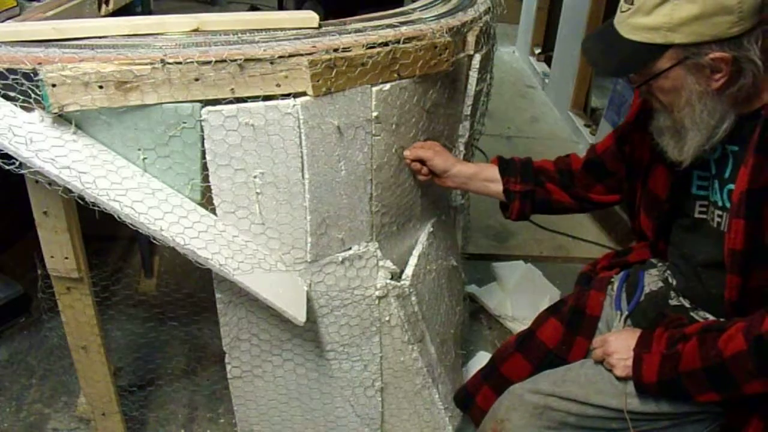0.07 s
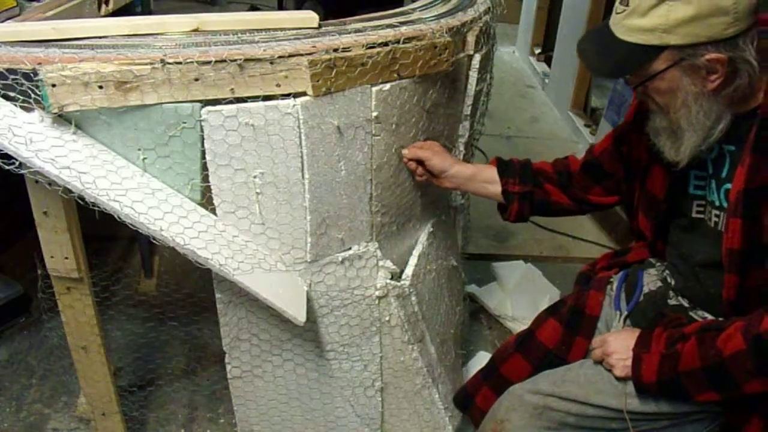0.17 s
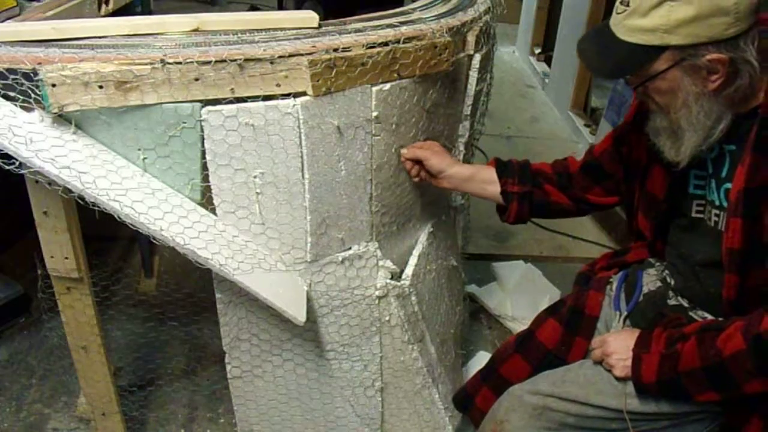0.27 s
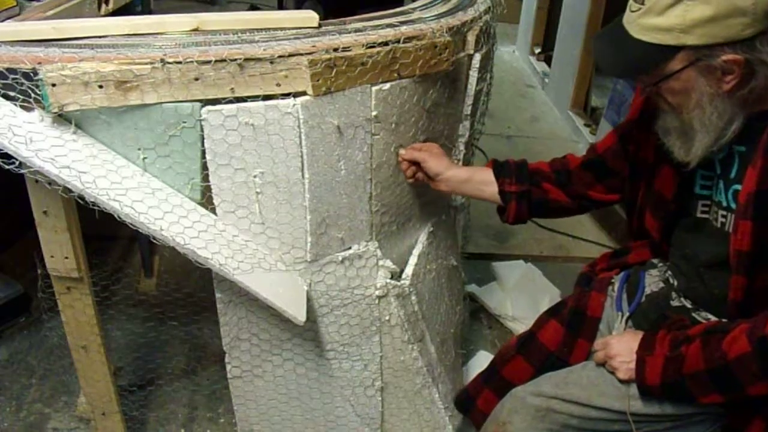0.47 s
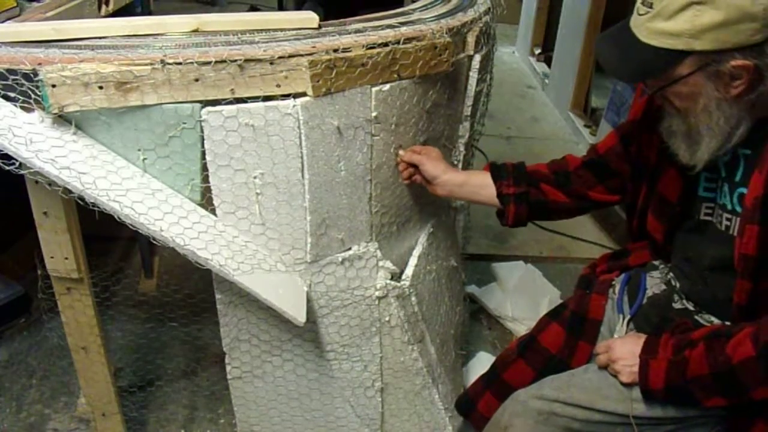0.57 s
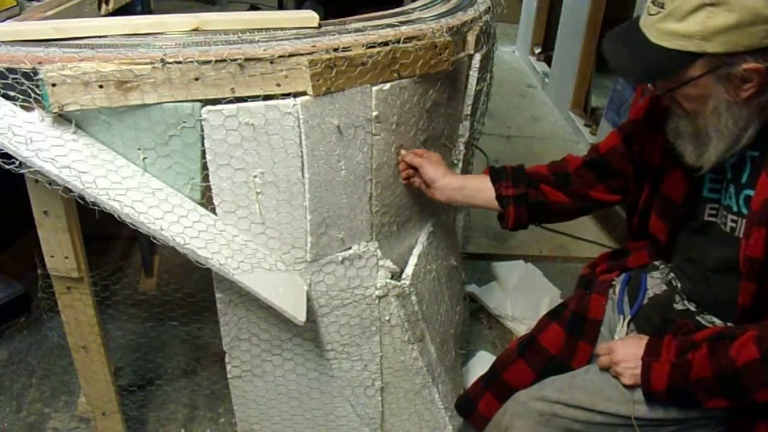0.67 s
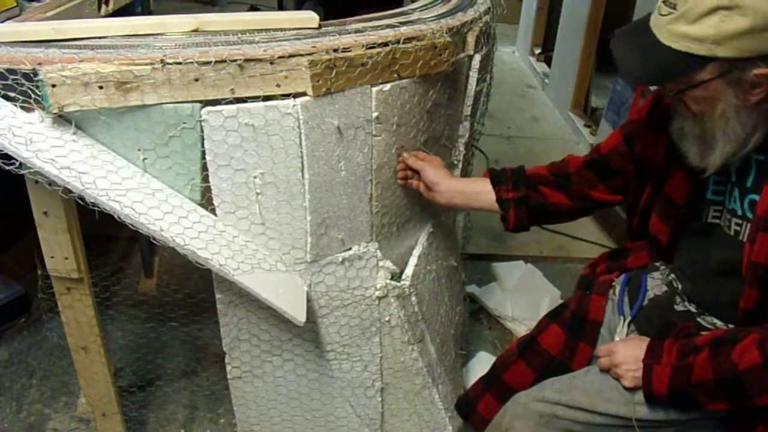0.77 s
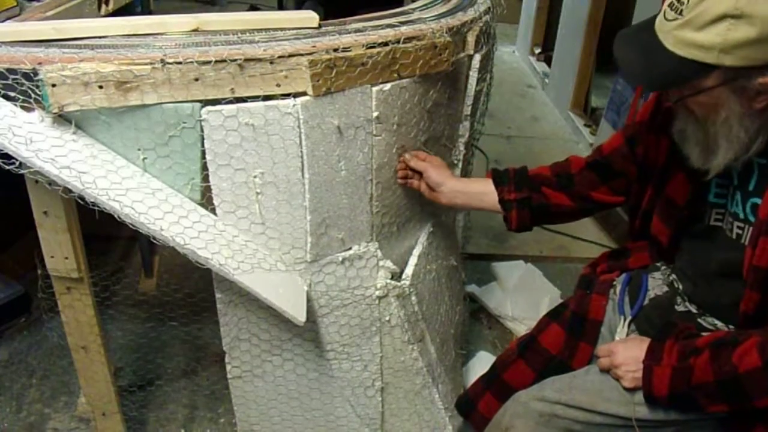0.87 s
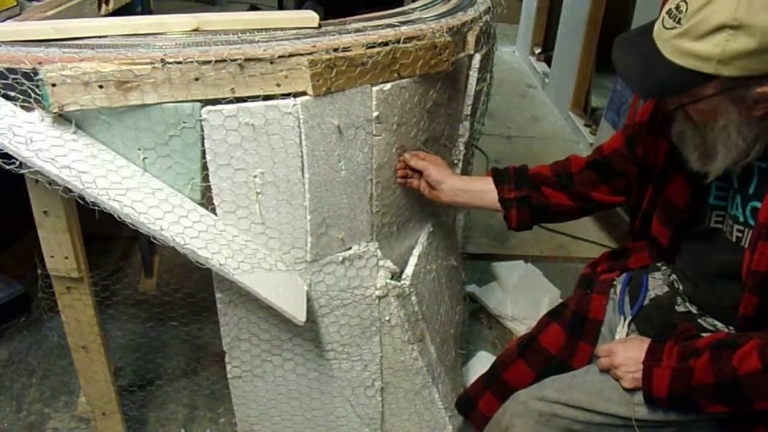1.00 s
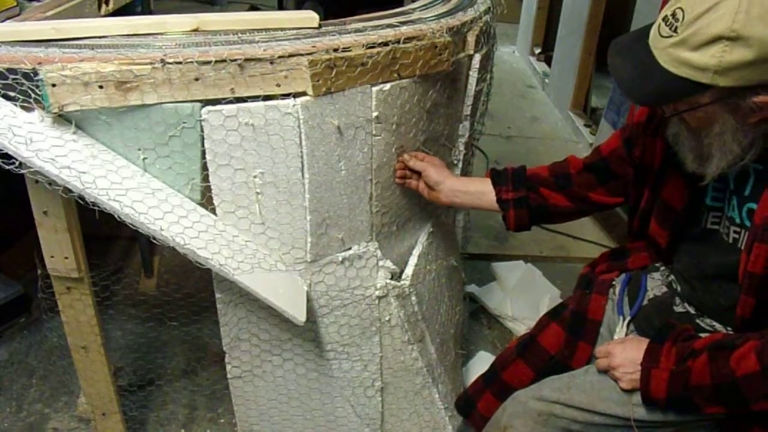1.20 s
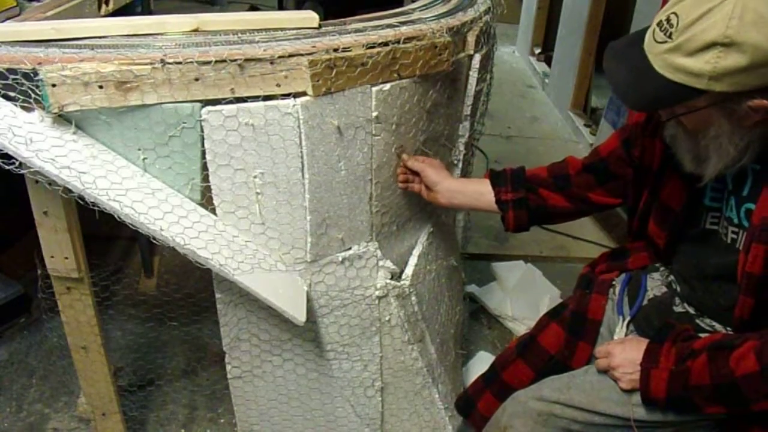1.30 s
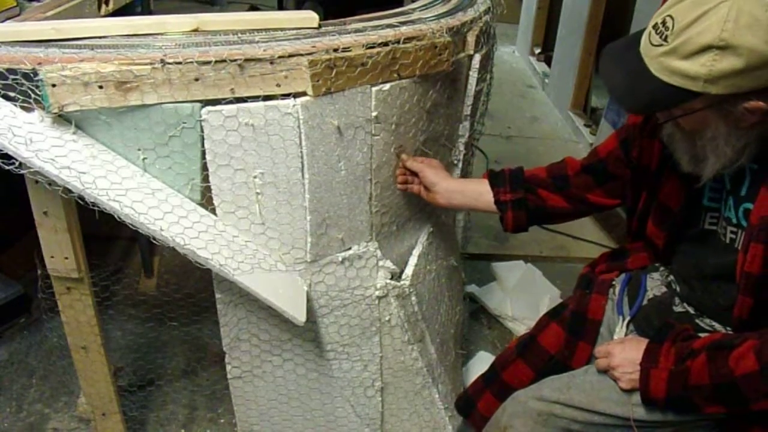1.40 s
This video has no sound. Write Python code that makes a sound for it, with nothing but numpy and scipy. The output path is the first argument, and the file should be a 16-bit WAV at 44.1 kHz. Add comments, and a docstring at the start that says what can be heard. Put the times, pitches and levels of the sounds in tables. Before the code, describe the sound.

Sharp clicks and a short rattle of wire mesh as a hand works a tie wire.

```python
"""Low room noise, the camera's thin whine and a faint scrape, on one microphone close to the work.
In a workshop, a hand works a tie wire on a foam panel covered in wire mesh. The wire snaps free, the
panel thumps and the mesh rattles. The wire scrapes on, catches once more, and the hand brushes back.
Each click runs along the wire as a bending wave, so its treble reaches the microphone first."""
import sys
import numpy as np
from scipy import signal
from scipy.fft import rfft, irfft, next_fast_len
from scipy.io import wavfile

SR = 44100
rng = np.random.default_rng(int(sys.argv[2]) if len(sys.argv) > 2 else 0)


def inscribe(sig):
    """Save sig as 16-bit PCM at rate SR to the path in sys.argv[1].

    A 1-D sig is mono; a 2-D sig holds one channel per row.
    Samples are clipped to [-1, 1] before scaling.
    """
    pcm = np.round(np.clip(np.atleast_2d(sig).T, -1, 1) * 32767)
    wavfile.write(sys.argv[1], SR, pcm.astype(np.int16))


N = 63945
T = np.arange(N) / SR
SIZE = next_fast_len(2 * N)
HZ = np.maximum(np.arange(SIZE // 2 + 1) * SR / SIZE, 1)

# Tone of the room, the hand's brushing, the wire on foam, the loose mesh and an arriving click.
# Each row: frequency in Hz, relative level in dB.
ROOM_TONE = [(25, -16), (55, -3.5), (140, 0.5), (280, -0.5), (450, -7), (750, -7), (1200, -12), (2200, -12),
             (4000, -28), (5600, -28.5), (6600, -24.5), (9000, -24.5), (11000, -29), (13000, -22),
             (16000, -25)]
BRUSH_TONE = [(150, -12), (400, 3), (900, 6), (2100, 3), (3000, -6.5), (6000, -20), (16000, -32)]
SCRAPE_TONE = [(150, -22), (480, -8), (720, -0.5), (1100, -0.5), (2300, -1), (3100, -3.5), (3900, -1),
               (4850, -8), (5500, -15), (6600, -12.5), (9300, -11.5), (10400, -18.5), (12500, -10.5),
               (16000, -15.5)]
CHATTER_TONE = [(500, -14), (2400, 1), (4500, 0), (5600, -22), (6600, -17), (9000, 3), (11000, -1),
                (13000, 8), (16000, 1)]
CLICK_TONE = [(150, -21.5), (600, -11.5), (1100, -5), (1600, 1.5), (2300, 0.5), (3200, -1.5), (4200, -1),
              (5700, -16.5), (6600, -2), (7800, -12.5), (8800, -2), (11000, -12), (12500, -4), (13600, -9),
              (14800, -16)]
# Course of the hand's brushing and of the wire's pressure on the foam.
# Each row: time in seconds, relative level in dB.
BRUSH_SWELL = [(1.25, -111), (1.28, -57.5), (1.32, -61), (1.36, -77), (1.40, -85), (1.42, -62.5),
               (1.45, -93)]
SCRAPE_PRESSURE = [(0, -61), (.07, -64), (.13, -67), (.2, -59), (.25, -49), (.61, -71.5), (.64, -63.5),
                   (.74, -63.5), (0.789, -58.5), (.82, -63), (.9, -56), (.95, -56), (1.055, -59),
                   (1.09, -66.5), (1.13, -60), (1.165, -60.5), (1.23, -75), (1.45, -72.5)]
# Resonances of the scraped panel and the caught strand. Each row: centre in Hz, width in Hz, gain in dB.
PANEL_PEAKS = [(699, 34, 9.5), (967, 44, 9), (2440, 160, 6), (4830, 170, 1)]
CAUGHT_PEAKS = [(590, 51, 12.5), (1570, 270, 5.5), (3620, 340, 6), (4770, 450, 11), (9250, 530, 2.5)]
# The wire's end scratches. Each row: peak time in seconds, length in seconds, level in dB, pitch in Hz.
END_SCRATCHES = [(.640, 0.033, -63, 2220), (0.795, 0.013, -62, 4340), (0.907, .015, -60, 2360),
                 (1.052, 0.031, -57, 3740), (1.154, 0.041, -64.5, 3720), (1.275, 0.018, -68, 4500)]
# What rings on: the panel's recoil, its higher modes, the shivering mesh, the frame and workshop.
# Each row: frequency in Hz, relative level in dB, seconds to fall by 60 dB.
RECOIL_MODES = [(146.8, -11.5, 0.69), (183, -0.5, 0.13), (229, 4, 0.17), (309.4, -8.5, 1), (489, 4, 0.095),
                (661.3, 2.5, 0.19), (776, -20, 0.45), (1000, 5, 0.075), (1530, -13, 0.046)]
PANEL_MODES = [(671.5, 0, 0.44), (730, 4.5, 0.47), (1048, 2, 0.39), (1635, -5, 0.51), (1728, -8, 0.51),
               (1853, -2, 0.4), (2100, -8, 0.49), (2332, -2, 0.26), (2485, 5, 0.5), (2570, 0, 0.63),
               (2955, 0, .45), (3120, -3, 0.42)]
MESH_SHIVER = [(150, -33, 0.08), (505, -11, 0.046), (1170, -3.5, 0.12), (2300, 4.5, 0.035),
               (3960, 0.5, 0.036), (5700, -7, 0.077), (9000, -4.5, .07), (10800, -14, 0.1),
               (13600, -11, .05), (15900, -31, 0.033)]
WORKSHOP_RING = [(99, -2.5, 1), (285, 3.5, 0.26), (700, -2.5, 0.41), (1190, -4, 0.89), (2320, 1, 0.29),
                 (4040, -6, 0.71), (5560, -14, 0.7), (9100, -12, 0.12), (11200, -15, 0.16),
                 (13600, -14, 0.38), (16000, -22, 0.41)]
# The wire gives, snaps and rattles; later the mesh catches, lets go and bounces.
# Each row: start in seconds, relative level in dB, tilt in dB per octave, extra treble in dB.
WIRE_SNAPS = [(.2258, -21.5, -5, 5), (.2291, 0.1, 0, -0.5), (0.2553, -23, -1.5, 5), (.2578, -12, 0, 1.5),
              (0.3172, -23, -1, 6.5), (.3255, -21.5, -1.5, 4), (0.3359, -10.5, -1, -10),
              (0.3634, -25, 4, -1.5), (.3660, -17, 2.5, -13), (.4030, -20, 1.5, -2),
              (0.4121, -12.5, 1, -26), (.4180, -17, 2.5, -3.5), (0.4502, -22.5, 2, -3),
              (0.474, -33.5, 9.5, -3.5)]
MESH_CATCHES = [(.9545, -23.5, 2.5, 0), (.9570, -23.5, -0.5, 0.5), (.9600, -31.5, -2, -9),
                (.9675, -32, 1, -9), (.9735, -30, 1.5, 3)]
# Light ticks of wire on wire. Each row: start in seconds, relative level in dB.
WIRE_TICKS = [(.555, -39.5), (.583, -41), (1.043, -50), (1.1250, -40), (1.13, -36.5), (1.161, -43),
              (1.186, -40), (1.2622, -41), (1.283, -52)]
# Narrow dips in the sound. Each row: centre in Hz, width in Hz.
NARROW_DIPS = [(2760, 70), (3375, 120), (7240, 520), (10790, 520), (14460, 550)]


def from_db(db):
    """Decibels to gain."""
    return 10 ** (np.asarray(db) / 20)


def at_hz(table, hz, column=1):
    """Read a column of a table on a log-frequency axis."""
    rows = np.array(table)
    return np.interp(np.log(hz), np.log(rows[:, 0]), rows[:, column])


def level(points):
    """Gain over time from rows of seconds and dB."""
    return from_db(np.interp(T, *np.transpose(points)))


def causal(db):
    """Minimum-phase response with this gain, so that nothing sounds early."""
    cepstrum = irfft(np.log(from_db(db)), SIZE)
    cepstrum[1:SIZE // 2] *= 2
    cepstrum[SIZE // 2 + 1:] = 0
    return np.exp(rfft(cepstrum))


def colour(x, tone):
    """Filter by rows of Hz and dB."""
    return irfft(rfft(x, SIZE) * causal(at_hz(tone, HZ)), SIZE)[:N]


def through(x, response):
    """Sound x through an impulse response."""
    return signal.fftconvolve(x, response)[:N]


def rms_one(x):
    """Scale to unit level."""
    return x / np.sqrt(np.mean(x ** 2) + 1e-20)


def resonate(x, peaks):
    """Lift a few resonances out of a sound."""
    for hz, width_hz, db in peaks:
        x = x + (from_db(db) - 1) * signal.lfilter(*signal.iirpeak(hz, hz / width_hz, fs=SR), x)
    return x


def background(room_db=-64, whine_db=-73, whine_hz=7870, wobble_hz=25, wobbles_per_s=30):
    """Steady room noise and the camera's thin whine, wobbling thirty times a second."""
    room = rms_one(colour(rng.standard_normal(N), ROOM_TONE))
    pitch_hz = whine_hz + wobble_hz * np.sin(2 * np.pi * wobbles_per_s * T)
    whine = np.sin(2 * np.pi * np.cumsum(pitch_hz) / SR)
    return from_db(room_db) * room + from_db(whine_db) * whine


def friction(tone, peaks=(), slips_per_s=1800, spread_db=3, shiver_gain=0.73, shiver_s=0.0078):
    """Many tiny slips, each followed by a shiver of the mesh; unit level."""
    sizes = from_db(spread_db * np.minimum(rng.exponential(1, N), 4))
    signs = rng.choice([-1, 1], N)
    slips = sizes * signs * (rng.random(N) < slips_per_s / SR)
    shiver = rms_one(rng.standard_normal(N) * np.exp(-T / shiver_s)) / np.sqrt(N)
    rubbing = colour(slips + shiver_gain * through(slips, shiver), tone)
    return rms_one(resonate(rubbing, peaks))


def hand_brush():
    """The hand brushes back over the panel with a soft, dull rub."""
    return level(BRUSH_SWELL) * friction(BRUSH_TONE)


def scratches(skirt_db=-14, step_octaves=0.5):
    """The wire's end scratches: brief swells of friction, each around its own pitch."""
    out = 0
    for peak_s, length_s, db, hz in END_SCRATCHES:
        tone = [(hz * 2 ** (step * step_octaves), abs(step) * skirt_db) for step in range(-2, 3)]
        swell = np.exp(-(2 * (T - peak_s) / length_s) ** 2)
        out = out + from_db(db) * swell * friction(tone)
    return out


def wire_scrape(gain_db=1.5):
    """The wire drags over the foam, louder under pressure, and the panel resonates."""
    return from_db(gain_db) * level(SCRAPE_PRESSURE) * friction(SCRAPE_TONE, PANEL_PEAKS)


def mesh_chatter(start_s=0.235, start_db=-53, fall_db_per_s=40, until_s=0.68, release_s=0.053):
    """Loose mesh goes on rattling finely after the snap, dying away."""
    fall = from_db(start_db - fall_db_per_s * (T - start_s)) * (T > start_s)
    release = np.exp(-np.maximum(T - until_s, 0) / release_s)
    return fall * release * friction(CHATTER_TONE, slips_per_s=950)


def ringing(modes, t):
    """Struck modes: decaying sines in random phase."""
    return sum(from_db(db - 60 * t / t60) * np.sin(2 * np.pi * (hz * t + rng.random()))
               for hz, db, t60 in modes)


def panel_thump(start_s=0.2268, gain_db=-44, rise_s=0.003):
    """At the first snap the light panel springs back in its low modes."""
    age = np.maximum(T - start_s, 0)
    return from_db(gain_db) * ringing(RECOIL_MODES, age) * (1 - np.exp(-age / rise_s))


def dense_ring(table, build_s):
    """Dense ringing: third-octave bands of noise, each with its own energy and decay."""
    white, out = rfft(rng.standard_normal(N), SIZE), 0
    edges = np.geomspace(70, 18000, 25)
    build = 1 - np.exp(-T / build_s)
    for low, high in zip(edges, edges[1:]):
        hz = np.sqrt(low * high)
        band = irfft(white * ((HZ >= low) & (HZ < high)), SIZE)[:N]
        decay = from_db(-60 * T / at_hz(table, hz, column=2))
        gain = np.sqrt(2 * (high - low) / SR / N) * from_db(at_hz(table, hz))
        out = out + gain * rms_one(band * decay * build)
    return out


def wire_echoes(echo_db=-5, spread_s=0.0011, dull_hz=4500):
    """Twists in the mesh scatter the wave, so duller copies follow within milliseconds."""
    scatter = rms_one(rng.standard_normal(N) * T * np.exp(-T / spread_s))
    dulled = signal.sosfilt(signal.butter(2, dull_hz, fs=SR, output="sos"), scatter)
    return from_db(echo_db) * dulled / np.sqrt(N)


def bending_waves(rows, travel_s=0.0042, travel_at_hz=1001, pivot_hz=3500, treble_hz=5200):
    """One pulse per row, spread into a falling chirp because treble runs faster along the wire."""
    octaves = np.log2(np.clip(HZ, 700, 14000) / pivot_hz)
    shelf = 1 / (1 + (treble_hz / HZ) ** 6)
    pulses = sum(causal(db + tilt * octaves + treble_db * shelf) * np.exp(-2j * np.pi * HZ * start_s)
                 for start_s, db, tilt, treble_db in rows)
    lag_cycles = 2 * travel_s * np.sqrt(travel_at_hz * HZ)   # travel time goes as 1 / sqrt(frequency)
    return irfft(pulses * np.exp(-2j * np.pi * lag_cycles), SIZE)[:N]


def wire_clicks(direct_db=3.5, shiver_db=1.5, catch_shiver_db=3, workshop_db=1, panel_db=-54):
    """Snaps, ticks and catches reach the microphone as a chirp, a shiver of mesh and a long ring."""
    workshop = from_db(workshop_db) * dense_ring(WORKSHOP_RING, build_s=0.0046)
    shiver = from_db(shiver_db) * dense_ring(MESH_SHIVER, build_s=0.00038)
    panel = from_db(panel_db) * ringing(PANEL_MODES, T)
    ticks = [(start_s, db, 3, 0) for start_s, db in WIRE_TICKS]   # tilted up 3 dB per octave
    snaps = bending_waves(WIRE_SNAPS + ticks)
    catches = resonate(bending_waves(MESH_CATCHES), CAUGHT_PEAKS)
    hits = snaps + catches
    direct = from_db(direct_db) * colour(hits + through(hits, wire_echoes()), CLICK_TONE)
    mesh = through(snaps + from_db(catch_shiver_db) * catches, shiver)
    return direct + mesh + through(hits, workshop + panel)


def scene():
    """The work on the panel in front, room noise and whine behind, in mono."""
    work = wire_clicks() + wire_scrape() + hand_brush() + panel_thump() + mesh_chatter() + scratches()
    return (work + background())[None]


def record(dry, cutoff_hz=15700):
    """Narrow dips are cut into the sound, then the top is cut steeply."""
    for hz, width_hz in NARROW_DIPS:
        dry = signal.lfilter(*signal.iirnotch(hz, hz / width_hz, fs=SR), dry)
    return signal.sosfilt(signal.ellip(10, .3, 70, cutoff_hz, fs=SR, output="sos"), dry)


dry = scene()
out = record(dry)
inscribe(out)
```